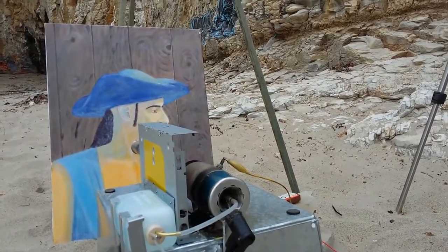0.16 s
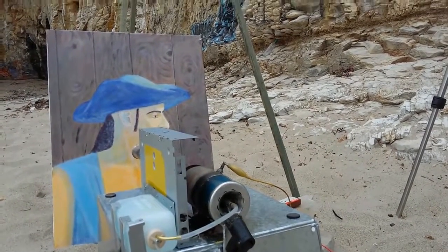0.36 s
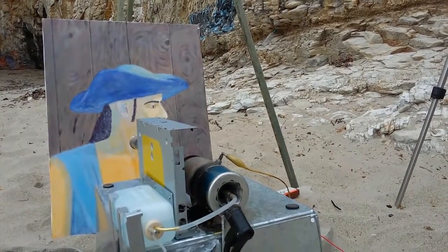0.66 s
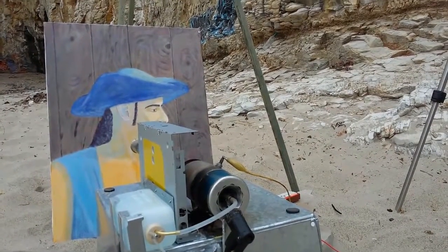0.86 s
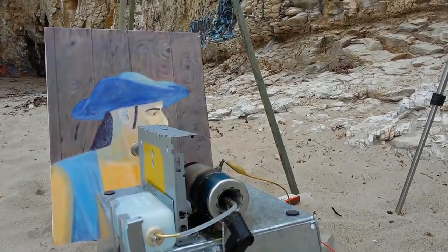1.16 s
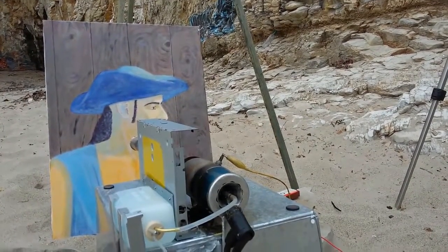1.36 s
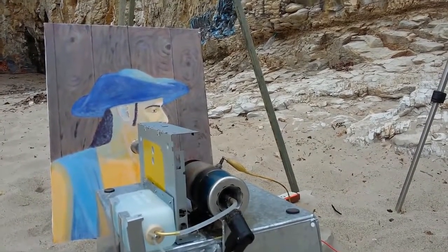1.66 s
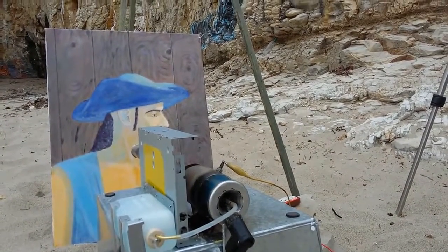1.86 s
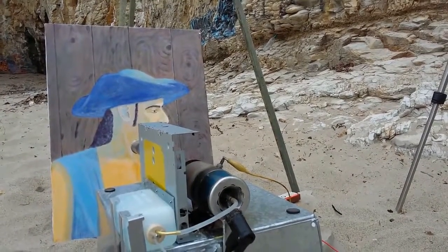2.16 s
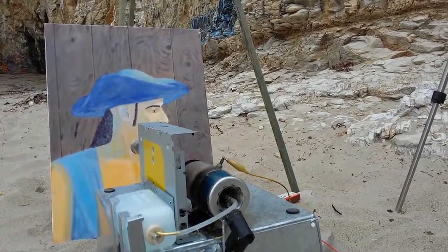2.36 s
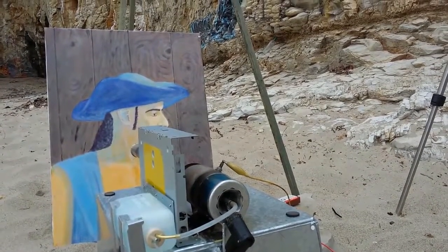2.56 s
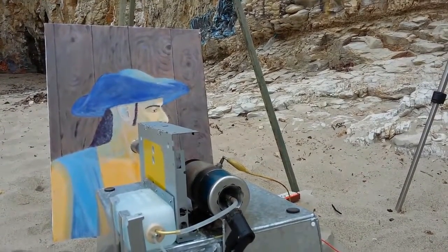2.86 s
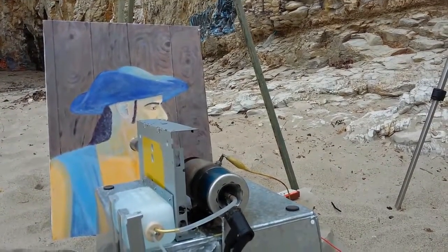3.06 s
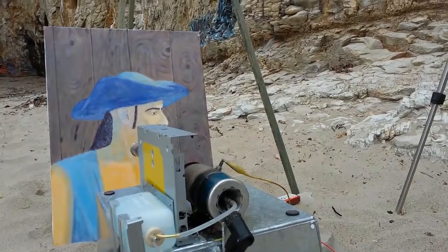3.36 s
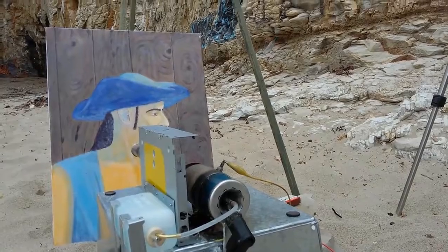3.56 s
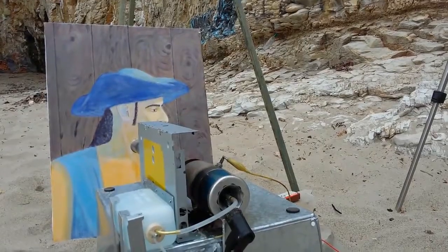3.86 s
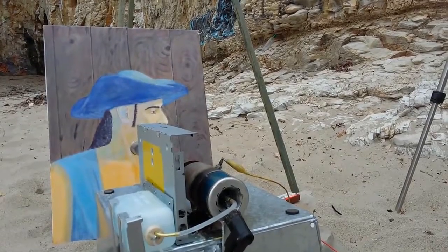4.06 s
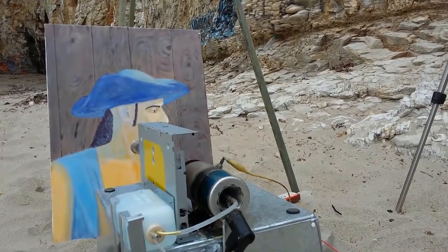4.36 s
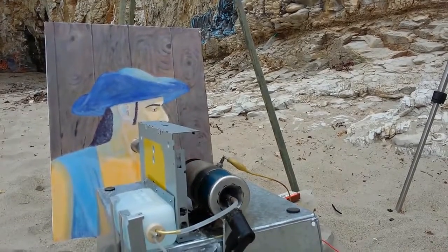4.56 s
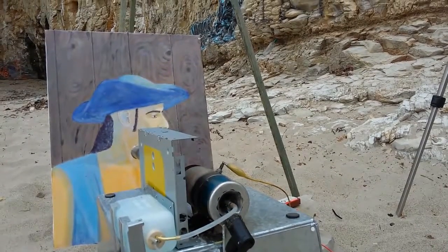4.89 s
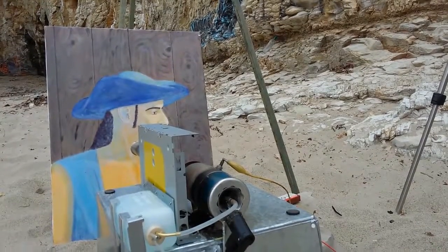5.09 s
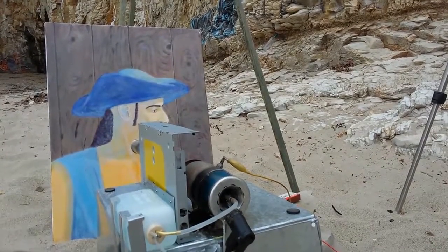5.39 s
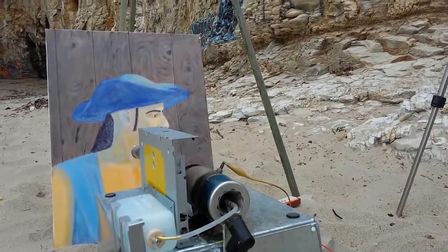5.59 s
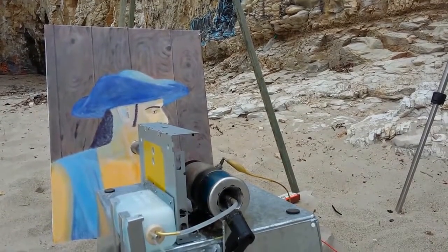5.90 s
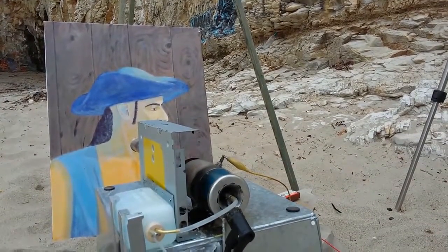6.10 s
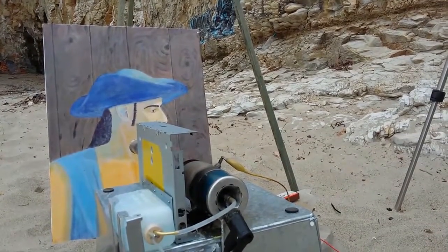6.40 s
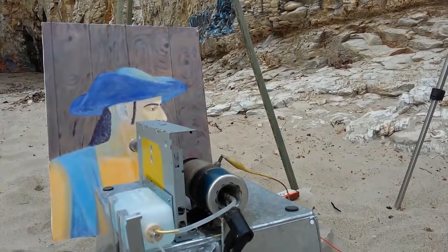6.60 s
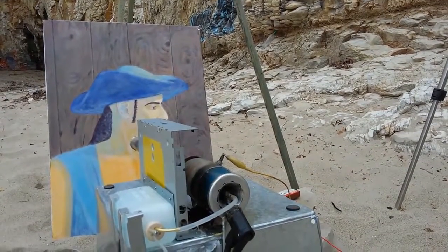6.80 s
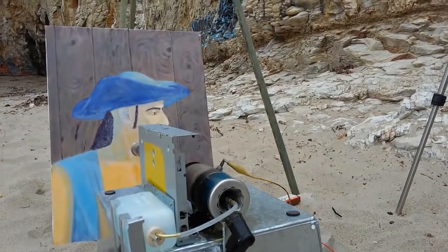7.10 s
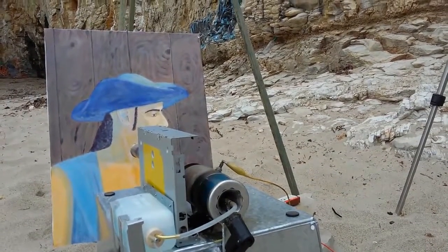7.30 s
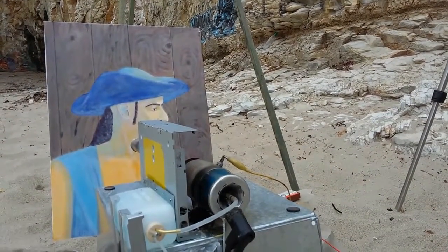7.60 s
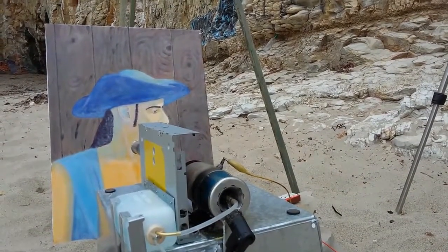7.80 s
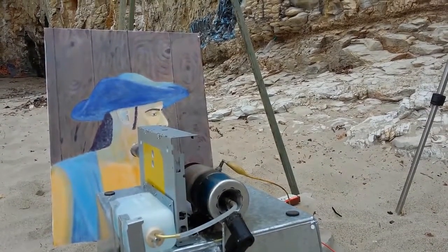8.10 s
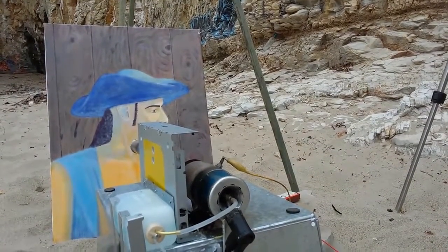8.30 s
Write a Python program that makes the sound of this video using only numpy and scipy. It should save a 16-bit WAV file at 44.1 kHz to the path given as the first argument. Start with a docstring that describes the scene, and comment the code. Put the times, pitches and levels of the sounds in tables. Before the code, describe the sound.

A hand pump pushes short hisses of air into a small pulse jet, a little under twice a second, while an igniter ticks rapidly. Early on the fuel catches with a sharp thump that rings the steel pipe and echoes off a cliff. The engine then barks briefly and chokes, and three more thumps follow as the pumping continues. Low surf rumbles behind, and the stereo microphone is close.

```python
"""On a beach under a cliff, a small pulse jet is coaxed to start, close to a camera's stereo microphone.
Over a low rumble of surf, a hand pump hisses air into the intake, stroke after stroke, and the igniter
ticks about ten times a second. At 0.6 s the fuel catches with a thump that rings the steel pipe, and the
cliff answers. At 2.3 s it barks for a few cycles and chokes. Three more thumps follow, the last at 6.4 s,
then a light knock on the frame; the pumping goes on to the end."""
import sys
import numpy as np
from scipy import signal
from scipy.fft import rfft, irfft
from scipy.io import wavfile
from scipy.ndimage import uniform_filter1d

SR = 44100
rng = np.random.default_rng(int(sys.argv[2]) if len(sys.argv) > 2 else 0)


def master(y):
    """Save y as 16-bit WAV."""
    cut = np.clip(np.atleast_2d(y).T, -1, 1)
    pcm = np.round(cut * 32767)  # scale
    wavfile.write(sys.argv[1], SR, pcm.astype(np.int16))


N = 372625
TIME = np.arange(N) / SR

# Colour of the flame. Each row: frequency in Hz, left and right in dB, likeness of the sides from 0 to 1.
FLAME_COLOUR = [(300, -5, -1, 0.6), (950, 7.5, 2.5, 0.8), (1620, 0.5, -4.5, 0.5), (2358, -7, -11.5, 0),
                (4640, 2, -1.5, 0.82), (5600, -3, -6, .2), (12000, -3, -16, .1)]


def undb(db):
    """Decibels to gain."""
    return 10 ** (np.asarray(db) / 20)


def level(x, db=0):
    """Set the rms of the middle of a stereo pair."""
    return x * undb(db) / np.sqrt(np.mean(x.mean(0) ** 2))


def cut(x, hz, kind, order=2):
    """Butterworth low-pass or high-pass."""
    return signal.sosfilt(signal.butter(order, min(hz, .45 * SR), kind, fs=SR, output="sos"), x)


def spectrum(hz, values):
    """Join points over log frequency, for every bin."""
    return np.interp(np.log(np.fft.rfftfreq(N, 1 / SR) + 1), np.log(hz), values)


def stereo_noise(hz, left_db, right_db, likeness):
    """Noise with its own colour on each side, partly shared between them."""
    mid, side = rfft(rng.standard_normal((2, N)))
    alike = np.clip(spectrum(hz, likeness), -1, 1)
    mid, side = mid * np.sqrt(1 + alike), side * np.sqrt(1 - alike)
    left = (mid + side) * undb(spectrum(hz, left_db))
    right = (mid - side) * undb(spectrum(hz, right_db))
    return irfft([left, right], N)


def narrow_noise(hz, width_hz):
    """A narrow band of noise whose centre moves."""
    drift = cut(rng.standard_normal((2, N)), width_hz / 2, "low")
    tone = np.real((drift[0] + 1j * drift[1]) * np.exp(2j * np.pi * np.cumsum(hz) / SR))
    return tone / tone.std()


def walk(rate_hz):
    """A random wander with a spread near 1."""
    step = max(int(SR / rate_hz), 1)
    return uniform_filter1d(np.repeat(rng.standard_normal(N // step + 1), step), step)[:N]


def fade(t60):
    """One second of exponential decay."""
    return np.exp(-np.log(1000) * TIME[:SR] / t60)


def scatter(t60, delay_s):
    """A diffuse stereo tail, of unit energy a side, that sets in after a delay."""
    tail = rng.standard_normal((2, SR)) * fade(t60) * (TIME[:SR] > delay_s)
    return tail / np.sqrt(np.sum(tail ** 2) / 2)


def ring(x, response):
    """Play a sound through a response."""
    return signal.fftconvolve(np.atleast_2d(x), np.atleast_2d(response), axes=1)[:, :N]


def impulses(rows):
    """One impulse for each pair of time in seconds and level in dB."""
    out = np.zeros(N)
    for s, db in rows:
        out[int(s * SR)] += undb(db)
    return out


def surf():
    """Low rumble and a thin wash rise and sink with the waves; fine spray goes with the wash."""
    # Surf and breeze. Each row: time in seconds, relative levels of rumble and wash in dB.
    waves = [(.2, -43.5, -52.5), (1.4, -44, -58.5), (2, -42.5, -54.5), (2.7, -51.5, -57),
             (3.7, -40.5, -52.5), (4.3, -38, -49.5), (4.8, -42, -50.5), (5.6, -52.5, -56.5),
             (6.7, -40, -59), (7.15, -49, -63.5), (7.7, -44.5, -55.5), (8.4, -50.5, -56)]
    # Colour of the sea. Each row: frequency in Hz, relative level in dB.
    sea_colour = [(15, -48.5), (25, -19.5), (86, 1.5), (176, -2), (219, -5.5), (309, -15), (427, -20.5),
                  (475, -21.5), (637, -23.5), (1540, -32.5), (5880, -42), (8320, -45), (15000, -39.5)]
    times, *levels = np.transpose(waves)
    rumble_db, wash_db = (np.interp(TIME, times, column) for column in levels)
    hz, db = np.transpose(sea_colour)
    sea = stereo_noise(hz, db, db, likeness=0.68 / (1 + (hz / 800) ** 4))
    rumble = level(cut(sea, 420, "low", order=4), -1) * undb(rumble_db)
    wash = cut(cut(sea, 380, "high", order=4), 6500, "low", order=4)
    wash = level(wash, -1.36) * undb(wash_db + 0.46 * walk(10))
    spray = level(cut(sea, 6000, "high", order=4), -11) * undb(wash_db + .8 * walk(18))
    return rumble + wash + spray


def bumps(hz=95, t60=0.083):
    """Dull bumps, felt more than heard."""
    # Soft low bumps. Each row: start in seconds, relative level in dB.
    hits = [(.109, -24.5), (.332, -22.5), (.903, -21.5), (1.394, -25.5), (1.884, -26.5), (3.517, -26.5),
            (4.479, -26), (8.264, -27)]
    thud = fade(t60) * np.sin(2 * np.pi * hz * TIME[:SR])
    return undb(-2) * cut(ring(impulses(hits), thud), 220, "low")


def knock(start_s=6.573, t60=0.03):
    """Something taps the frame once, dry and light."""
    tap = ring(impulses([(start_s, -33.5)]), fade(t60) * rng.standard_normal(SR))
    return cut(cut(tap, 1400, "low"), 550, "high")


def hoots():
    """Short airy tones glide up in the mouth of the intake as the flow picks up."""
    # Intake hoots. Each row: start and end in seconds, first and last pitch in Hz, level in dB.
    glides = [(2.747, 2.867, 842, 1150, -49.5), (3.3, 3.389, 653, 1197, -47), (4.447, 4.53, 856, 1144, -46)]
    hz, gain = np.full(N, 1000.), np.zeros(N)
    for start, end, from_hz, to_hz, db in glides:
        during = (TIME > start) & (TIME < end)
        progress = (TIME[during] - start) / (end - start)
        hz[during] = from_hz + (to_hz - from_hz) * np.sin(np.pi * progress / 2)
        gain[during] = undb(db) * np.sin(np.pi * progress)
    return gain * narrow_noise(hz, width_hz=45)


def igniter(first_s=.2008, period_s=.10337):
    """The igniter runs freely; each spark is the same tiny bright snap, scattered by the engine's frame."""
    sparks = impulses((s, -18) for s in np.arange(first_s, TIME[-1], period_s))
    edge = cut(sparks, 10000, "high", order=4) * undb([[3.5], [-2]])
    body = cut(np.roll(sparks, int(.0002 * SR)), 1500, "high") * undb([[-8.5], [-16.5]])
    snap = edge + body
    return snap + undb(-9) * ring(snap, scatter(t60=.025, delay_s=0.00096))


def pump(build_s=.22, vent_s=0.069, fastest_before_end_s=0.13, fast_half_width_s=0.064, flutter_db=2.1):
    """The nozzle hisses while there is pressure; the pipe rushes most when the piston is fastest."""
    # Pump strokes. Each row: end and length in seconds, relative nozzle hiss and pipe rush in dB.
    strokes = [(.155, .377, -27, -38.5), (0.733, .41, -27.5, -37), (1.291, .39, -30, -42),
               (1.865, 0.38, -27, -40), (2.442, 0.39, -27, -36.5), (3.008, 0.35, -30, -38.5),
               (3.561, 0.34, -27, -36.5), (4.119, 0.36, -28, -38), (4.715, 0.39, -28.4, -36.5),
               (5.291, 0.37, -26.8, -37), (5.86, 0.35, -27, -38), (6.447, 0.37, -27.5, -38.5),
               (7.013, 0.37, -29.5, -41.5), (7.595, 0.36, -28.5, -41.5), (8.186, 0.38, -27, -37)]
    # Colour of the air jet. Each row: frequency in Hz, left and right in dB, likeness from 0 to 1.
    jet_colour = [(152, -20, -22.5, 0.8), (317, -11, -9.5, 1), (600, -22, -23, 0.7),
                  (1030, -13, -14.5, 0.8), (1280, -17.5, -20, 0.9), (2352, -22, -24.5, 0.7),
                  (3190, -19.5, -22.5, 0.9), (4580, -8.5, -12.5, 0.6), (5000, -18, -19, 0.4),
                  (6500, -10.5, -24, 0.9), (7700, -7, -15.5, 0.95), (9240, -7, -23, .35),
                  (10420, -2.5, -19.5, 0.2), (10750, -1, -6.5, 1), (13800, 3, -7.5, 0.9),
                  (15700, -4, -4.5, 1)]
    hiss_gain, sizzle_gain, rush_gain, speed = np.zeros((4, N))
    for end, length, hiss_db, rush_db in strokes:
        during = (TIME > end - length) & (TIME < end)
        remaining = end - TIME[during]
        build = np.sin(np.pi / 2 * np.clip((length - remaining) / build_s, 0, 1))
        vent = np.sin(np.pi / 2 * np.clip(remaining / vent_s, 0, 1))
        speed[during] = 1 / (1 + ((remaining - fastest_before_end_s) / fast_half_width_s) ** 2)
        # the higher a band lies, the more steeply it follows the pressure
        hiss_gain[during] = undb(hiss_db) * build ** 3.9 * vent ** 1.7
        sizzle_gain[during] = undb((hiss_db + rush_db) / 2) * build ** 2.98 * vent ** 1.28
        rush_gain[during] = undb(rush_db) * build ** 0.8 * vent ** 0.54 * speed[during]
    air = stereo_noise(*np.transpose(jet_colour))
    hiss = level(cut(air, 9660, "high", order=6), 4.5)
    sizzle = level(cut(cut(air, 10200, "low", order=6), 5130, "high", order=6), -3)
    rush = level(cut(air, 5360, "low", order=6), 1.5)
    # the nozzle sings faintly, higher with speed, and partly drowns in turbulence at full flow
    full_flow = speed ** 4
    whistle = (1 - 0.44 * full_flow) * narrow_noise(7450 + 800 * full_flow, width_hz=300)
    sizzle = sizzle + whistle * undb([[-4], [-13]])
    layers = (hiss, hiss_gain), (sizzle, sizzle_gain), (rush, rush_gain)
    return sum(layer * gain * undb(flutter_db * walk(45)) for layer, gain in layers)


def swell(centre_s, width_s, hurry=1.65):
    """Pressure radiated by a ball of gas that swells quickly and collapses more slowly."""
    pace = np.where(TIME < centre_s, hurry, 1)
    offset_squared = np.minimum(((TIME - centre_s) / width_s * pace) ** 2, 100)
    return (offset_squared - 1) * np.exp(-offset_squared / 2)


def ignitions(lead_s=0.00337, hot_hz=1170, cool_hz=800, cooling_s=0.017):
    """A flame front runs ahead and crackles, the charge swells, the pipe's tone sinks as the gas cools."""
    # The fuel catches. Each row: time and swell width in seconds, thump and pressure front in dB,
    # the front's cutoff in Hz, gliding pipe tone and crackle in dB.
    charges = [(.637, .0021, -.5, 8, 1717, -12.5, -13), (2.2898, .0018, 0, -16, 899, -30, -29.5),
               (3.034, 0.0022, -1, -5, 1159, -29.5, -30.5), (4.8114, 0.0021, 2.5, 2, 560, -37, -43),
               (6.4463, .0023, 1, 1, 700, -29, -27.5)]
    tone_hz = cool_hz + (hot_hz - cool_hz) * np.exp(-TIME[:SR] / cooling_s)
    tone = fade(0.08) * np.sin(2 * np.pi * np.cumsum(tone_hz) / SR)
    pops, flame_gain = np.zeros((2, N))
    for s, width_s, thump_db, front_db, edge_hz, tone_db, crackle_db in charges:
        onset = impulses([(s - lead_s, 0)])
        front = undb(front_db) * cut(ring(onset, fade(0.0017))[0], edge_hz, "low", order=10)
        pops += undb(thump_db) * swell(s, width_s) + front + undb(tone_db) * ring(onset, tone)[0]
        flame_gain += undb(crackle_db) * ring(onset, fade(0.02))[0]
    return pops + flame_gain * cut(stereo_noise(*np.transpose(FLAME_COLOUR)), 5500, "low")


def bark(start_s=2.2945, choke_s=2.3165, cycle_hz=307.6,
         firing_growth_db_per_s=260, roar_growth_db_per_s=1000, collapse_db_per_s=2800.5):
    """The pipe's resonance drives the flame: a pulse and a gust each cycle, growing until it chokes."""
    until_choke, since_choke = np.maximum(choke_s - TIME, 0), np.maximum(TIME - choke_s, 0)
    burning = (TIME > start_s) * undb(-np.minimum(collapse_db_per_s * since_choke, 200))
    firing_gain = undb(7 - firing_growth_db_per_s * until_choke) * burning
    roar_gain = undb(6 - roar_growth_db_per_s * until_choke) * burning
    phase = ((TIME - start_s) * cycle_hz + 0.065 * walk(300)) % 1
    pulse = np.exp(-phase / 0.22)
    firing = -1.6 * (pulse - pulse.mean()) * firing_gain
    roar = stereo_noise(*np.transpose(FLAME_COLOUR)) * (0.87 + pulse) * roar_gain
    return cut(firing, 1700, "low") + cut(roar, 4600, "low")


def combustion(echo_spread=.13):
    """Blasts ring the pipe and come back from the sand, a nearby board and the cliff."""
    # Modes of the steel pipe. Each row: frequency in Hz, relative level in dB, t60 in seconds.
    pipe_modes = [(169, -15, 0.19), (252.5, -14, 0.36), (279, -10.5, 0.29), (324, -18, .42),
                  (382, 2.5, 0.094), (573.3, -8, .09), (727, -3.5, .04), (948.5, 0.5, 0.052),
                  (1003, -10, .07), (1215, -16.5, .16), (1500, -14.5, .16), (1832, -12, 0.072),
                  (4220, -10, .07), (4550, -8, .07), (4830, -9, 0.1)]
    blast = cut(ignitions() + bark(), 39, "high")
    steel = sum(undb(db) * fade(t60) * np.cos(2 * np.pi * hz * TIME[:SR]) for hz, db, t60 in pipe_modes)
    blast = blast + undb(-46) * ring(blast, steel)
    # long waves reach both microphone ports nearly alike; rough rock returns little treble
    near = scatter(0.098, 0.019)[0] + echo_spread * scatter(0.073, 0.01)
    cliff = scatter(.85, 0.023)[0] + echo_spread * scatter(.85, 0.077)
    echo = undb(-14) * cut(near, 2000, "low", order=1) + undb(-17) * cut(cliff, 350, "low")
    cliff_mids = undb(-28) * cut(scatter(0.86, 0.026), 1500, "low")
    return blast + ring(blast, echo + cliff_mids)


def scene():
    """The engine close by and the surf behind it, as they reach the microphone's two ports."""
    # The right port lies a little further off. Each row: frequency in Hz, lag in radians, gain in dB.
    right_port = [(30, .05, 1), (125.8, 0.083, 0.45), (250, 0.67, 1.6), (504.3, 0.66, -1), (1000, 0.15, -1),
                  (2000, 0.61, 1), (4500, 0.85, -1.5), (5955, 1.6, 3.5), (8000, 2.4, -1.5),
                  (10600, 1.1, -6.5), (12700, 1.8, 0), (15500, 1.7, 4.5)]
    left, right = pump() + hoots() + igniter() + combustion() + bumps() + knock()
    hz, lag, db = np.transpose(right_port)
    port_response = undb(spectrum(hz, db)) * np.exp(-1j * spectrum(hz, lag))
    right = irfft(rfft(right) * port_response, N)
    return np.array([left, right]) + surf()


def gain_control(x, threshold_db=-10, depth_db=7, recovery_db_per_s=5, attack_s=0.0064):
    """A blast turns the gain down within milliseconds; it creeps back over a second or so."""
    peak_db = 20 * np.log10(np.abs(x.mean(0)) + 1e-9)
    excess_db = np.clip(peak_db - threshold_db, 0, depth_db)
    recovered = recovery_db_per_s * TIME
    duck_db = np.maximum.accumulate(excess_db + recovered) - recovered
    return x * undb(-cut(duck_db, 1 / (2 * np.pi * attack_s), "low"))


def suppressor(x, threshold_db=-49, slope=0.77, depth_db=12, closing_db_per_s=42, bass_share=0.17):
    """Noise suppression opens at once on any clear sound and closes in the quiet, less so on the bass."""
    power = uniform_filter1d(cut(x.mean(0), 400, "high") ** 2, size=2048)
    heard_db = 10 * np.log10(np.abs(power) + 1e-12)
    wanted_db = np.clip(slope * (heard_db - threshold_db), -depth_db, 0)
    closed = closing_db_per_s * TIME
    gain_db = np.maximum.accumulate(wanted_db + closed) - closed
    bass = cut(x, 300, "low", order=1)
    return bass * undb(bass_share * gain_db) + (x - bass) * undb(gain_db)


def record(dry):
    """The camera ducks after blasts, hushes the pauses, flattens the loudest peaks and cuts the top."""
    held = suppressor(gain_control(dry))
    limited = held / (1 + held ** 6) ** (1 / 6)
    return signal.sosfilt(signal.ellip(10, .2, 70, 15800, fs=SR, output="sos"), limited)


dry = scene()
out = record(dry)
master(out)
```